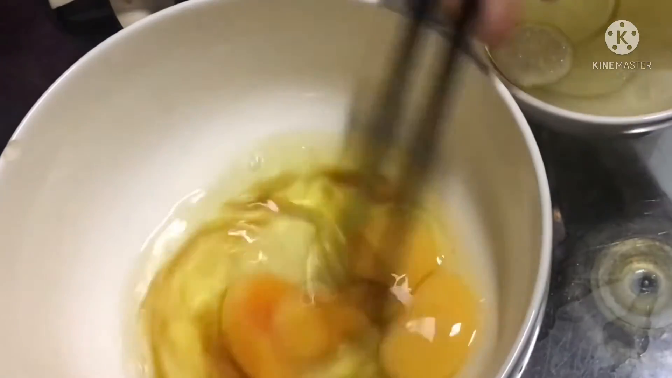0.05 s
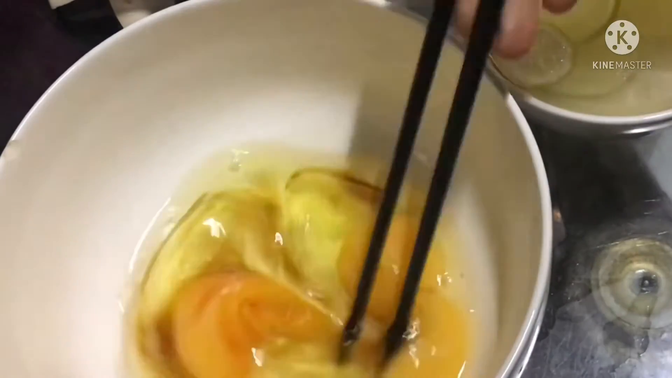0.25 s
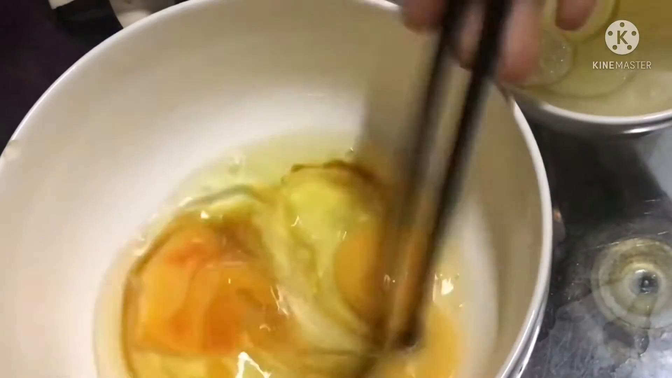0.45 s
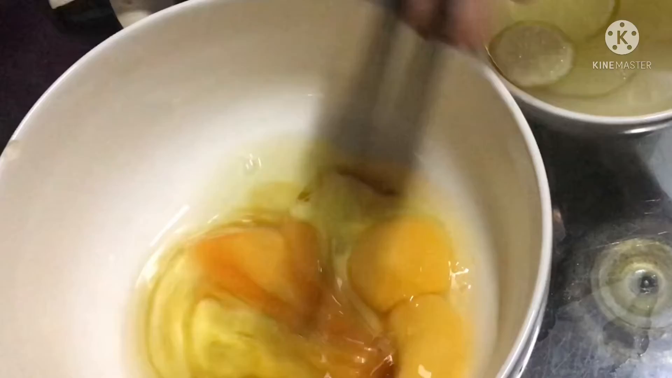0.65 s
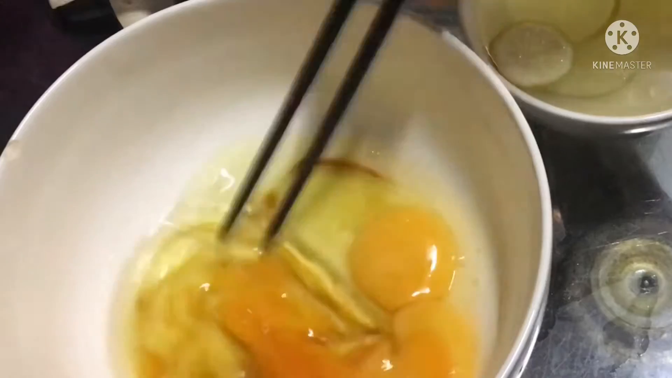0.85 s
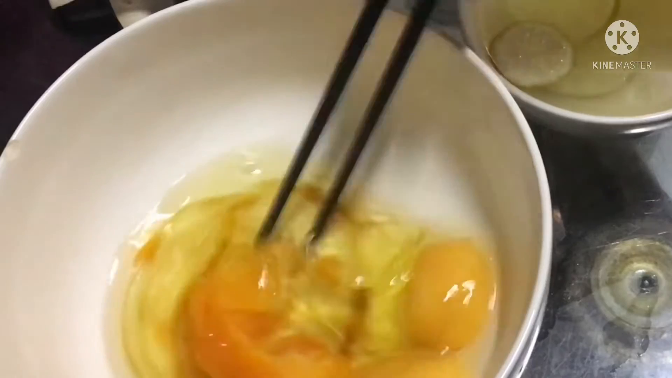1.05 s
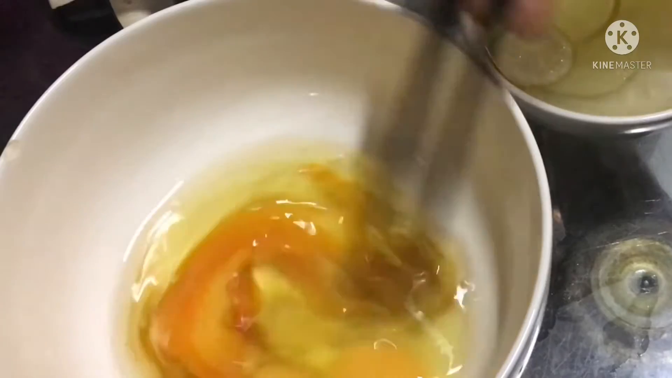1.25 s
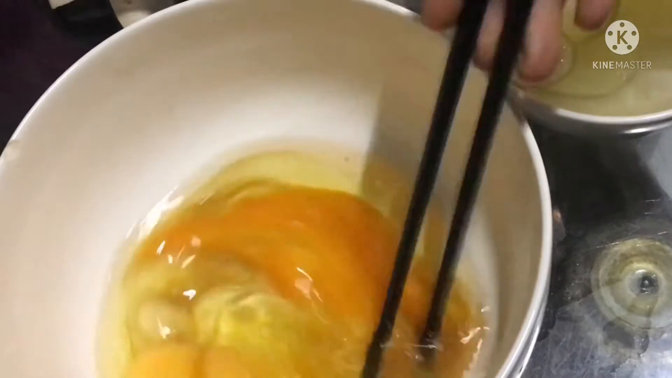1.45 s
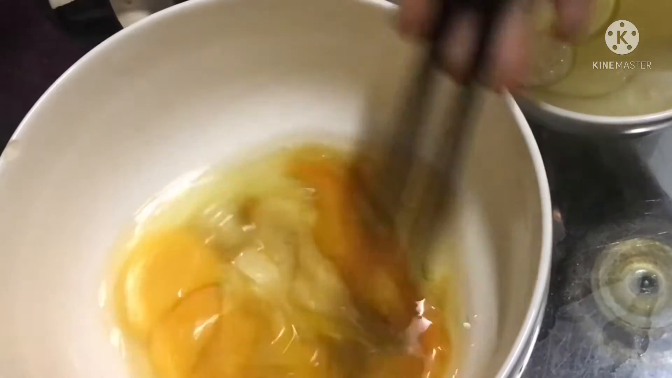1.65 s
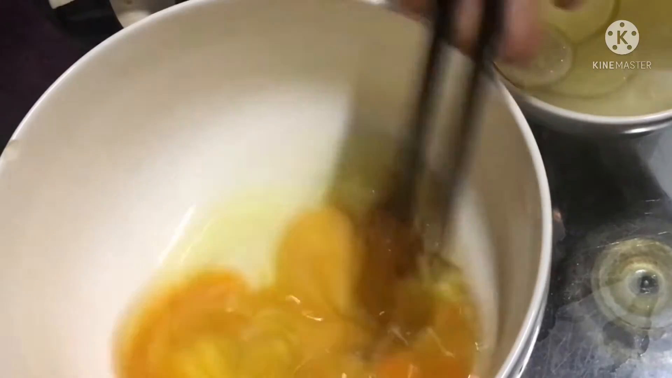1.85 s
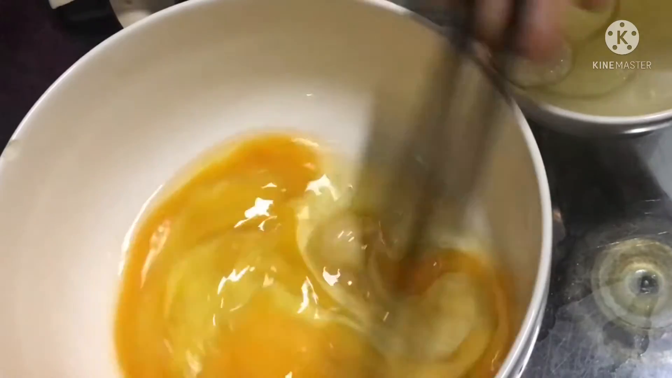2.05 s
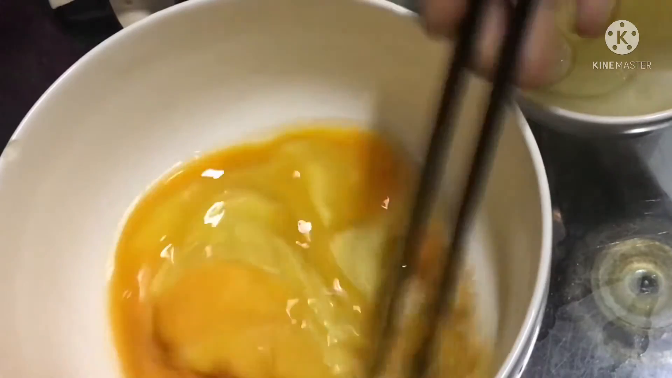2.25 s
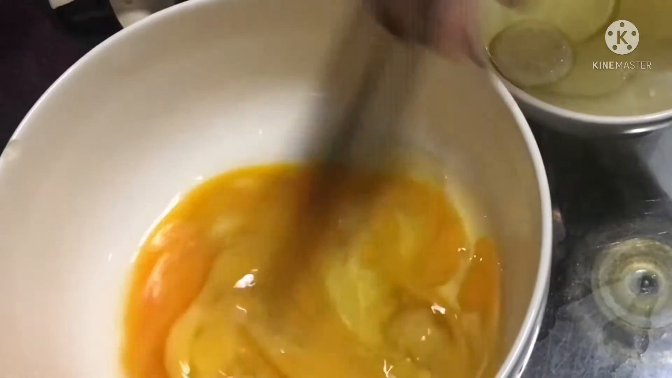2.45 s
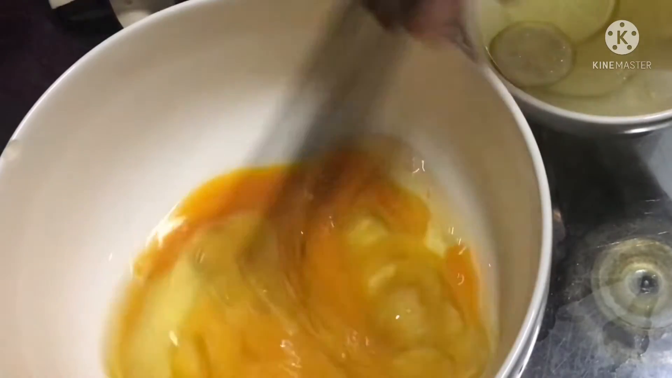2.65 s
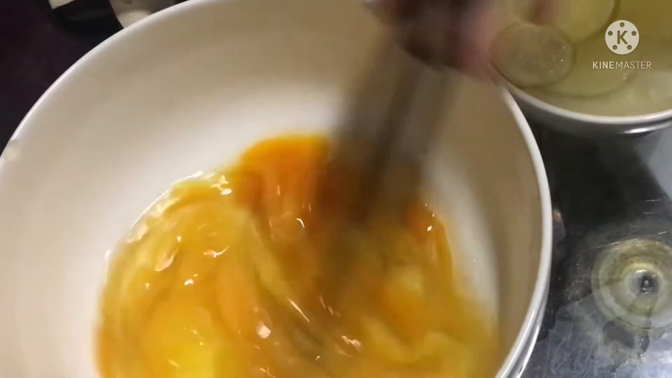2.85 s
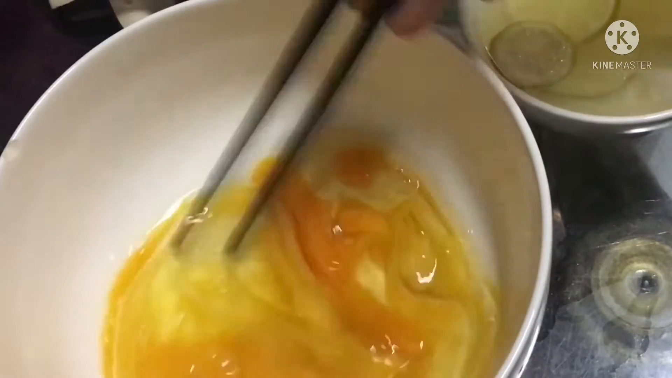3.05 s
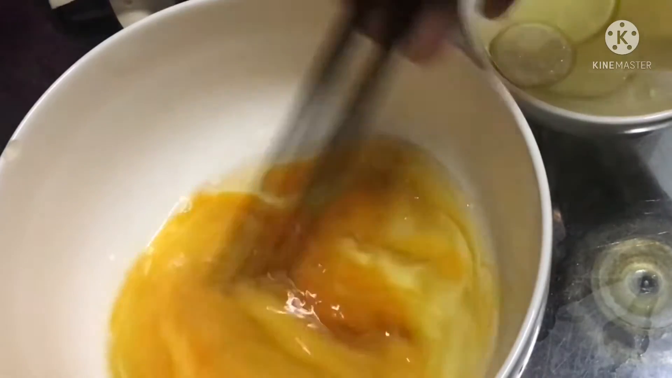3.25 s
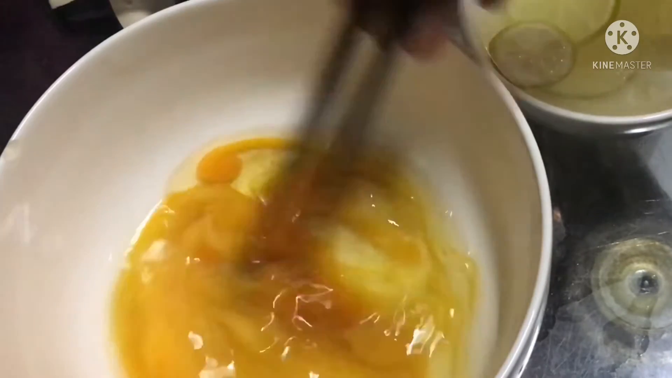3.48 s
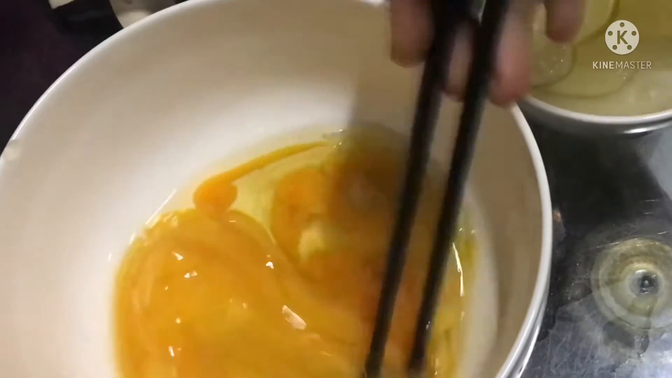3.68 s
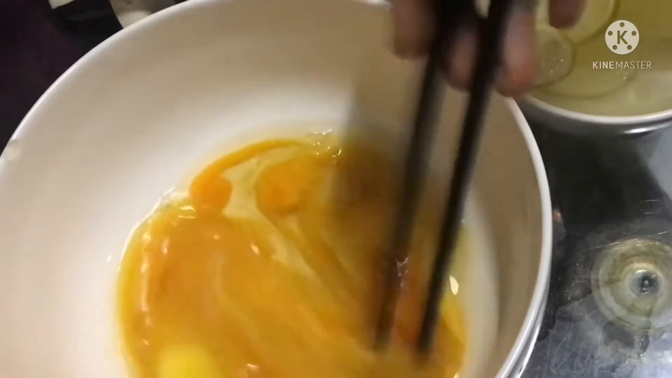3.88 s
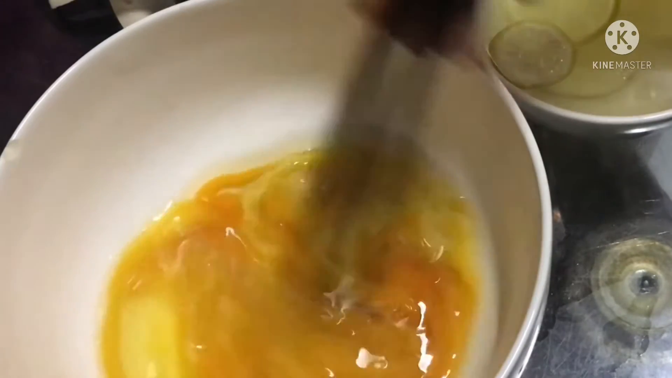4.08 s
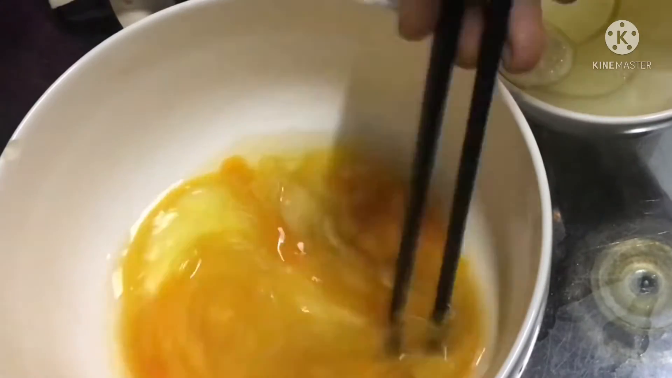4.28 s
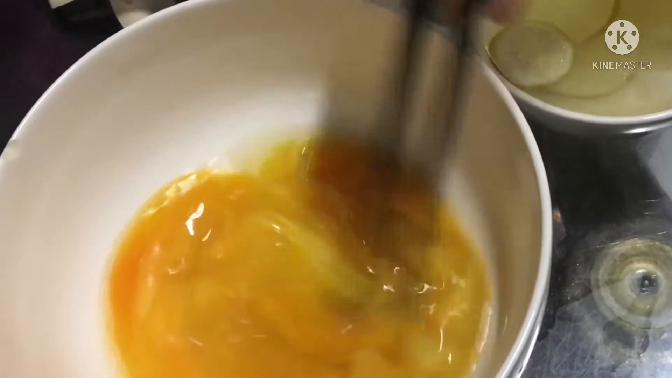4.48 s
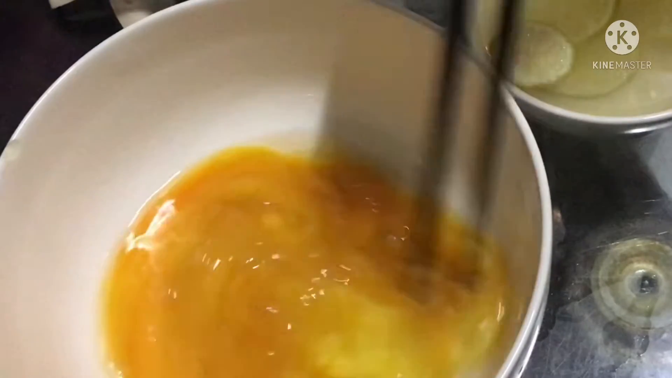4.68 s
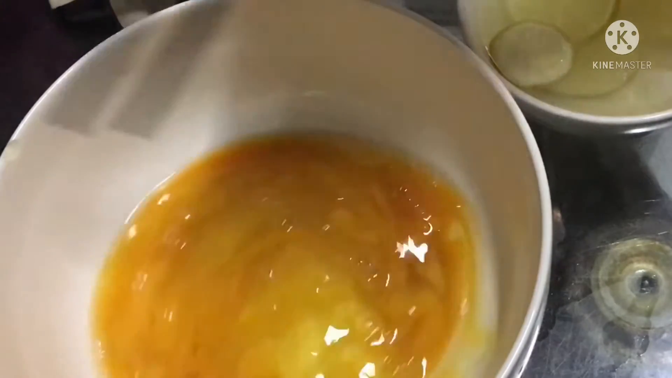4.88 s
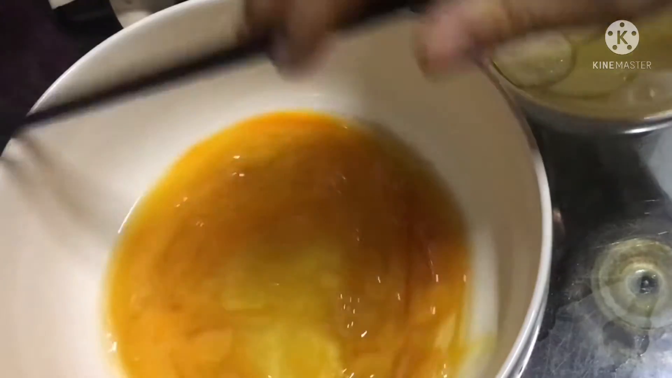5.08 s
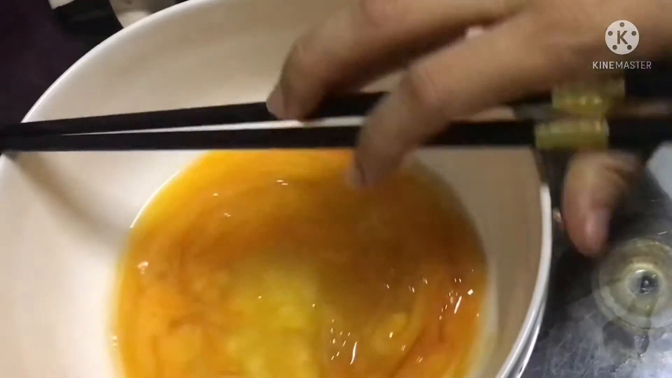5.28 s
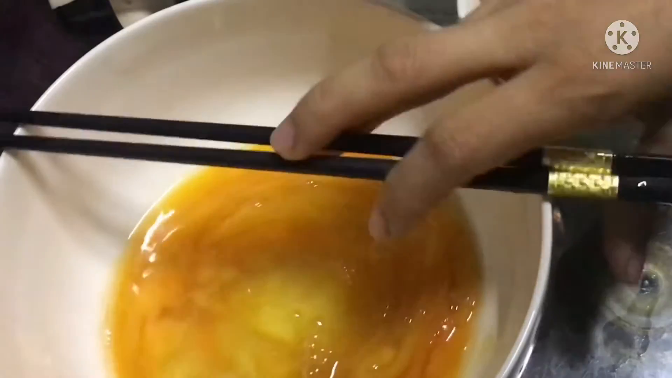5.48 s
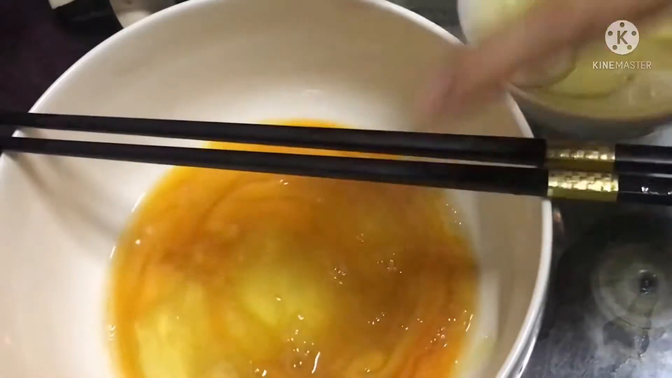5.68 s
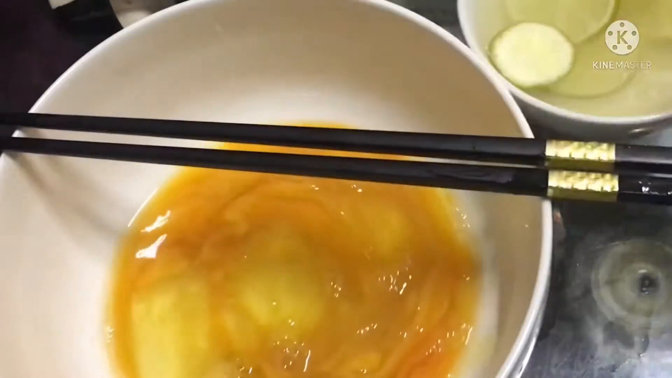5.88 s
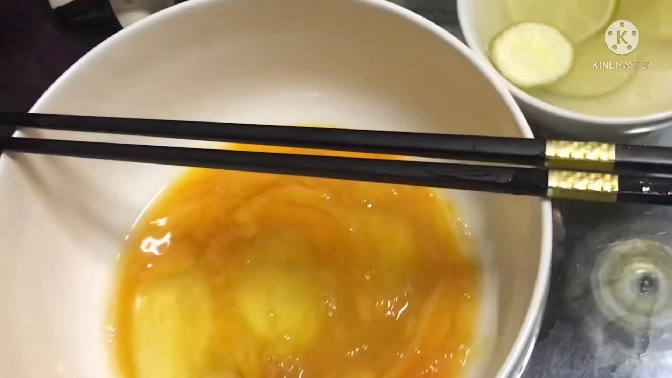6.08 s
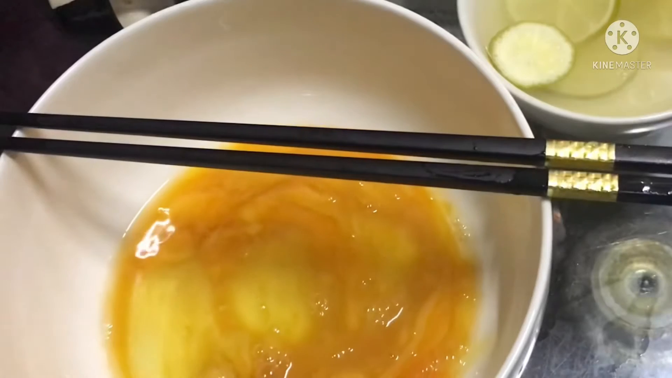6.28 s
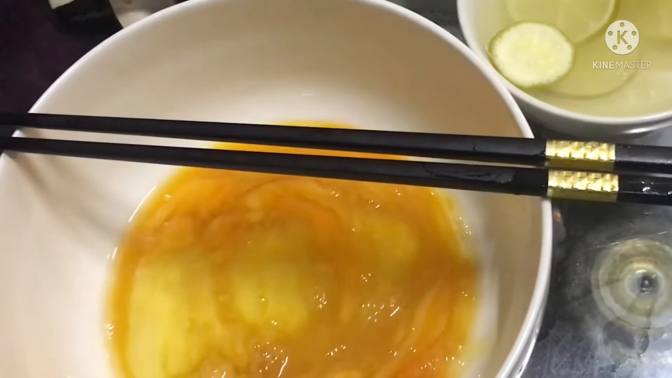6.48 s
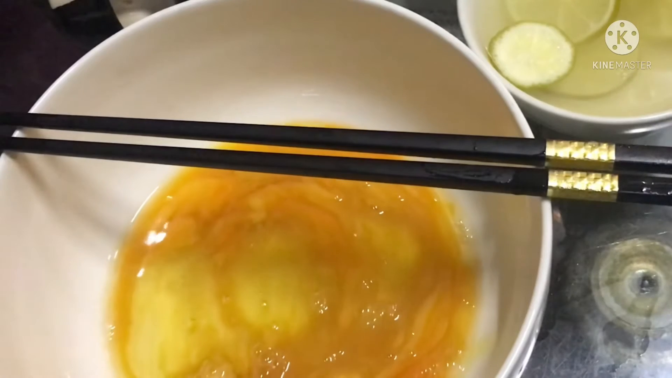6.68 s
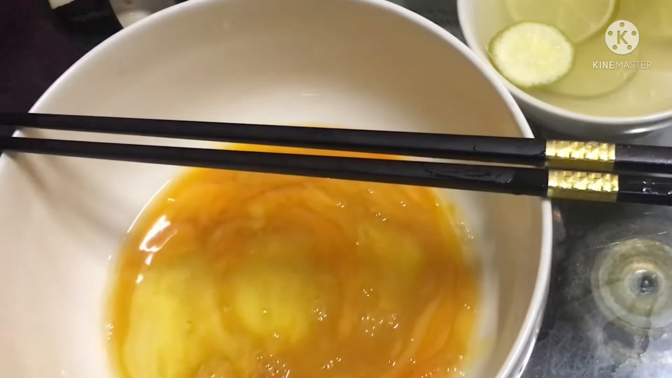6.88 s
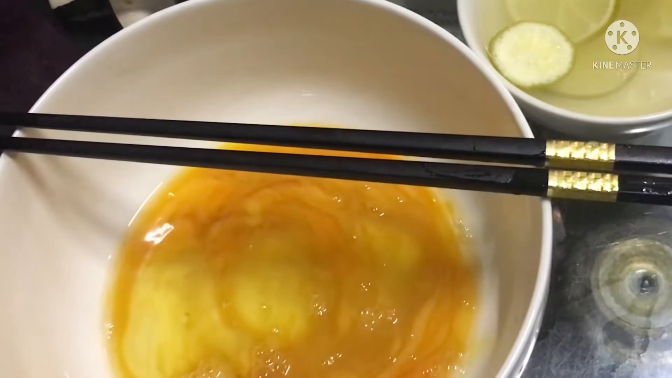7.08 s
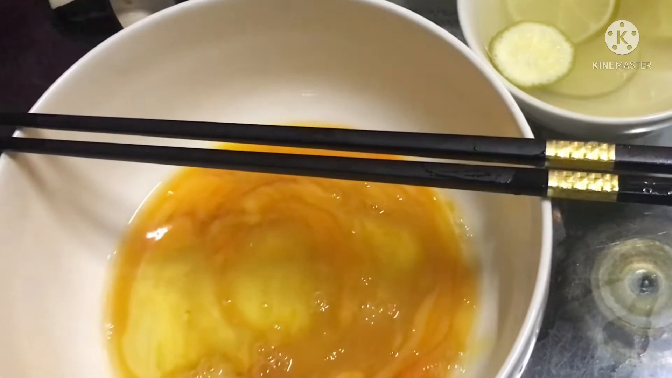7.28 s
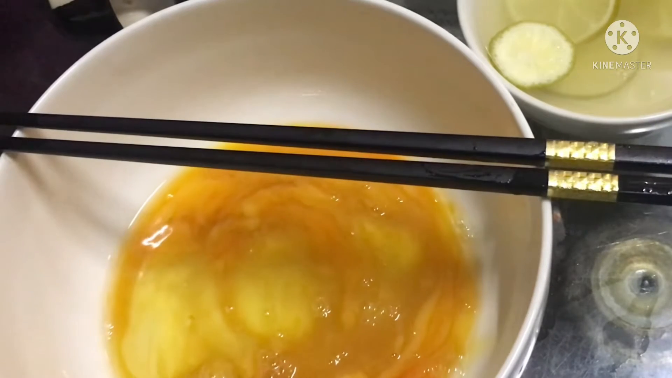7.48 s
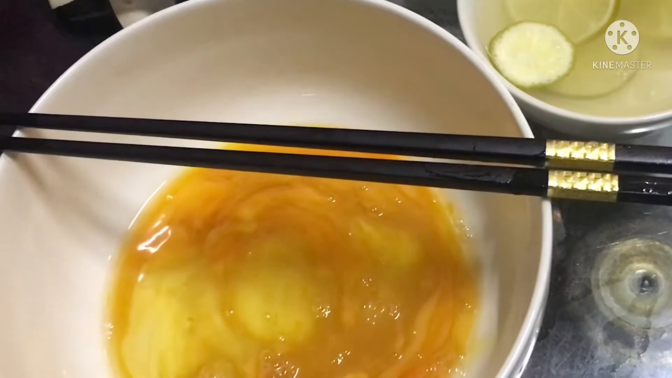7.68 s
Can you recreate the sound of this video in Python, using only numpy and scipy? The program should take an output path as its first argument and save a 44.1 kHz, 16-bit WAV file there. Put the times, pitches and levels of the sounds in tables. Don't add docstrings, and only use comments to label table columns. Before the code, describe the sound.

Fast, close ceramic tapping with gloopy egg splashes for five seconds, sticks laid down with a ringing rattle, then a quiet kitchen with far-off scrapes.

```python
import sys
import numpy as np
from scipy import signal
from scipy.fft import rfft, irfft, next_fast_len
from scipy.io import wavfile
from scipy.ndimage import uniform_filter1d

SR = 44100
rng = np.random.default_rng(int(sys.argv[2]) if len(sys.argv) > 2 else 0)


def how_loud(loudness_db):
    steps = np.asarray(loudness_db, float) / 20
    return 10 ** steps


def master_out(mix):
    frames = np.transpose(np.atleast_2d(mix))
    ceiling = np.clip(frames, -1, 1)
    pcm = np.round(ceiling * 32767).astype(np.int16)
    wavfile.write(sys.argv[1], SR, pcm)


N = 340893

# f/Hz, density/dB
ROOM_TONE = [(26, -5), (42, 5.5), (62, 7.5), (100, -5.5), (140, 1), (210, -8.5), (300, -15), (420, -2),
             (1250, -6.5), (2000, -14.5), (3200, -23), (5000, -28.5), (7000, -35), (9000, -31),
             (10500, -36.5), (16300, -32)]
# f/Hz, width/Hz, level/dB
FRIDGE_LINES = [(247.5, 12, -60), (296.2, 8, -57.5), (305, 45, -59.5), (597, 30, -61.5)]
# f/Hz, level/dB, t60/s
BOWL_MODES = [(774, -7.5, 0.04), (944, -6.5, 0.11), (1005, 6.5, 0.061), (1624, -16.5, 0.034),
              (1644, 2.5, 0.05), (2215, -10, 0.08), (2480, -7.5, 0.035), (2610, -14.5, 0.036),
              (3230, -8, 0.035), (3500, 0.5, 0.02), (3746, 2.5, 0.019), (3920, -6.5, 0.032),
              (4306, -8.5, 0.03), (4470, 1, 0.012), (5700, -9.5, 0.015), (6593, -8, 0.015),
              (6625, -0.5, 0.012), (7880, -10.5, 0.017), (8270, -2.5, 0.016), (8300, -11, 0.015),
              (9130, -2, 0.016), (2310, -7, 0.081), (10900, -11.5, .025), (12440, -14.5, .02),
              (14000, -26, .02), (14900, -8, 0.01)]
# f/Hz, level/dB, t60/s
UPPER_WALL_MODES = [(2226, 1, .2), (2500, -10, .12), (4370, -6, .22), (4430, -9, .15), (6600, -9, .14)]
# f/Hz, level/dB, t60/s
RIM_MODES = [(590, -13, .2), (755, -5, .22), (894, -12, .18), (1007, -22, .15), (1604, 0, .22),
             (1645, -16, .1), (2223, -15, .2), (2872, -5, .24), (4377, -6, .25), (4460, -9, .16),
             (5380, -11, .15), (6132, -12, .13), (8059, -18, .13)]

# t/s, peak/dB, pocket f/Hz, tap/dB
SPLASH_EVENTS = [(.078, -41, 9000, 0), (.706, -29.5, 6200, -7), (.721, -30, 10300, -18),
                 (.743, -29, 10800, -17), (.75, -43.5, 1190, 6), (.799, -30.5, 6940, -22),
                 (1.098, -19, 4060, -25.5), (1.115, -31.5, 14000, -5), (1.283, -26.5, 5800, -18),
                 (1.368, -28, 3370, 1), (1.650, -35.5, 4400, -16.5), (1.792, -32.5, 4470, -5.5),
                 (2.289, -21, 5080, -4), (2.372, -24.5, 1933, -18.5), (2.485, -23, 4440, 3.5),
                 (2.507, -15, 3500, -11.5), (2.545, -38, 5800, -13), (2.658, -10, 4580, -2.5),
                 (2.695, -26, 4360, -4), (3.056, -39.5, 2400, -3.5), (3.143, -36, 3300, -8),
                 (3.158, -28.5, 7000, -18.5), (3.244, -18, 4850, -23.5), (3.515, -50, 3570, -6),
                 (3.887, -34, 5190, -14.5), (7.292, -46, 9300, 0)]
# t/s, peak/dB, pocket f/Hz, tap/dB
AIR_POCKETS = [(0.506, -17.5, 1640, -9), (0.515, -35.5, 4040, 15), (0.542, -25.5, 3600, -31),
               (1.43, -23.5, 2260, -10.5), (1.702, -21.5, 2550, -4), (1.721, -12.5, 4380, -9),
               (1.762, -24.5, 3560, -20.5), (1.943, -15.5, 3600, -35.5), (2.081, -8.5, 4400, -5),
               (2.29, -18.5, 940, -16.5), (2.336, -17.5, 1593, -18.5), (2.371, -21, 4000, -10),
               (2.73, -13.5, 2024, -23), (2.847, -15, 4450, 1.5), (2.94, -26.5, 3320, -18),
               (3.106, -31, 2200, -7), (3.248, -10.5, 3460, -13), (3.405, -21.5, 3500, 1),
               (3.42, -25, 2480, -3), (3.457, -11.5, 1920, -9), (3.596, -10, 3340, -9.5),
               (3.61, -16, 1082, -52.5), (3.669, -28.5, 1380, -1), (3.771, -7.5, 3230, -4.5),
               (3.971, -14.5, 3630, 0.5), (4.183, -18, 2500, -2.5), (4.362, -31.5, 2420, -15),
               (4.381, -25, 1310, 7), (4.555, -32.5, 5500, -6.5)]
# t/s, peak/dB, pocket f/Hz, tap/dB
FURTHER_POCKETS = [
    (1.628, -41, 2930, -30),
    (1.6, -40.5, 3000, -24.5),
    (2.262, -31, 4150, -26),
    (2.341, -26, 2970, -6),
    (2.732, -29, 1600, -30),
    (2.860, -24, 2300, -32),
    (4.196, -16, 1037, -21),
]
# t/s, peak/dB, pocket f/Hz, tap/dB
DROPLETS_AND_TICKS = [(.572, -37, 3500, -20), (1.569, -34, 5500, 0), (1.775, -28, 3370, -24.5),
                      (1.787, -38.5, 5400, -20), (2.295, -30, 8300, -10.5), (2.328, -38, 3500, -25),
                      (2.486, -26.5, 7300, -25.5), (2.547, -37, 4200, -27), (3.670, -33, 5400, -21),
                      (3.838, -45.5, 9500, -20.5), (4.035, -38.5, 6500, -14.5), (4.098, -49.5, 7040, -22.5),
                      (4.197, -31, 5000, -15.5), (4.270, -40, 4305, -24), (4.366, -30, 4340, -23),
                      (4.660, -42, 5000, -22),
                      (1.534, -30.5, 2700, -5.5), (1.677, -27.5, 3500, -0.5), (3.951, -29.5, 2700, -6),
               (3.999, -37, 3300, -20), (4.445, -40.5, 3700, -20), (4.65, -47, 6500, -8.5),
               (.62, -55, 8500, -12), (5.157, -51, 2400, -26), (2.748, -37, 10000, -21),
               (2.859, -28, 6500, 2), (3.611, -32, 5000, -6), (2.82, -34, 7200, -21)]
# t/s, peak/dB, f/Hz, tap/dB
BOWL_RINGS = [
    (2.084, -21, 4360, -30),
    (2.292, -30, 1005, -30),
    (2.34, -32, 1610, -30),
    (2.376, -36, 3800, -30),
    (2.734, -29.5, 1620, -30),
    (5.186, -27.5, 1606, -30),
    (5.366, -39, 1604, -30),
    (5.436, -31.5, 1595, -30),
]

# t/s, second tip gap/ms, second tip level/dB
STROKE_TIPS = [(.1013, 2, 4), (.277, 3, 2), (.446, 4.5, 1), (.6375, 5.8, -1), (.8082, 1.8, 1),
               (.965, 2.7, 3), (1.1295, 4.4, 4), (1.302, 3.2, 5), (1.4818, 5.8, 4), (1.664, 6.6, -16),
               (1.848, 4, -6), (2.039, 3.6, 4), (2.228, 1, -1), (2.419, 4.4, -1), (2.6028, 1.4, 2),
               (2.791, 4.6, 0), (2.9865, 7, -5), (3.1752, 3.8, -4), (3.355, 1.2, 3), (3.542, 2.6, 4),
               (3.7268, 1.6, 4), (3.914, 3.3, 4), (4.1175, 2.2, 5), (4.301, 2.5, -5), (4.4885, 1.3, -4),
               (4.6752, 2.2, 0)]
STROKE_PEAKS = [-5.5, -7, -9, -6.5, -4, -1.5, -3.5, -3, -4.5, -6, -2.5, -2.5, -8, -3, -2, -4, -8, -2.5, -4,
                -3.5, -2, -2, 0, -3, -4.5, -1]
# f/Hz, level/dB, f/Hz, level/dB, lowest modes/dB
STROKE_PLACES = [(2140, 11.5, 3450, 8, -0.5), (2550, -6, 17000, 3, -26.5), (2270, 7, 6800, -27, 7.5),
                 (3725, 4, 9200, 4, 1), (1900, 13.5, 4400, -2.5, 11), (3540, -2, 4000, -5.5, 1),
                 (2270, 3.5, 3400, -14, 7), (2220, 8, 6600, -6, 4), (1600, -1, 8000, -12, -17),
                 (2740, -5.5, 9200, 8, -2.5), (2860, -11.5, 7300, 7.5, 1.5), (2550, 12.5, 22000, 0.5, 1.5),
                 (3000, -6.5, 6700, -4, 4), (3800, 2.5, 2900, -1, 0.5), (2200, 1.5, 13000, 8.5, 1),
                 (2550, 7, 8600, 8, 1.5), (3200, 3.5, 9300, -3, 1), (3210, 5.5, 4800, 1, 6),
                 (4400, 4.5, 5800, -3, 5), (2300, 6, 2700, 1.5, -3.5), (2300, 12.5, 6000, 8, 3.5),
                 (3270, 7.5, 9200, 4, 6), (4400, -5, 7400, 4, -1), (2550, 5, 3700, -9.5, 5),
                 (3650, -6, 6700, -16, -21), (3800, 5, 2230, 4.5, 8.5)]
# f/Hz, level/dB, treble/dB
STROKE_SLANTS = [(4900, 10, 3.5), (4400, -1, 6), (5700, 1, -1.5), (5600, -8, 2), (3770, 7.5, 4.5),
                 (3730, 3.5, 2), (4400, 0, 3.5), (2550, 2, 3.5), (1823, -7, 0.5), (1600, -7, -2),
                 (3600, 2.5, 4.5), (9220, -1, 4.5), (2200, -2.5, 8.5), (3020, 10.5, 4.5), (5700, -10, -2.5),
                 (12500, 2, 0.5), (3116, 6, 0.5), (3150, 0, 7.5), (4400, 5, -6.5), (2500, -1, 1),
                 (3180, 8.5, -2.5), (2230, 7, 1), (6740, 2, 2.5), (2200, -5.5, -0.5), (2500, 10, -1.5),
                 (6500, 3.5, -1.5)]
# t/s, peak/dB, low modes/dB, high modes/dB
RIM_KNOCKS = [(5.183, -15.5, -7.5, -1), (5.215, -5.5, -1, 9), (5.243, -13.5, -1, 12),
              (5.266, -18.5, -12, 26), (5.27, -21.5, 0, -6), (5.365, -35, 14, -26), (5.434, -31, 10, -25),
              (5.487, -13.5, 5, -10.5), (5.497, -19.5, -2, -3), (5.51, -11, 5.5, -9.5),
              (5.52, -26, 7, -18.5), (5.53, -27, 13, -20), (5.561, -44, 3, -14), (5.668, -36, 17, -21),
              (5.713, -33.5, 22.5, -26.5)]
# f/Hz, level/dB, f/Hz, level/dB, lowest modes/dB
RIM_PLACES = [(3000, -7, 5000, 5, 9), (2500, -8, 3400, 10, 7), (4400, 13, 3000, -18, 7),
              (5400, 3, 2900, -14, 0), (4400, -3, 3700, -8, -20), (4400, -4, 1800, -10, 14),
              (1600, 5, 4300, -9, 1), (9800, 19.5, 2020, 10.5, 4), (1600, 16, 4540, 4, -9),
              (1600, -3, 5000, 12, 1), (1600, 7, 6200, 4, 4), (1600, -6, 5000, -3, -2),
              (1600, -6, 8000, -3, 0), (1600, 0, 2940, 9, -1), (1600, -3, 4400, 0, -4)]

# t/s, level/dB, held/s, treble/dB
FAR_SCRAPES = [
    (6.274, -61, 0.014, -4),
    (6.381, -47.5, 0.0091, -18),
    (6.453, -35.5, 0.048, -6.5),
    (6.53, -33.5, 0.0096, -6.5),
    (6.616, -38.5, 0.023, -13),
    (6.795, -49.5, 0.025, -7.5),
    (7.04, -44, 0.0041, -15),
    (7.295, -65, 0.0054, 2),
]
# f/Hz, density/dB
SCRAPE_BODY = [(47, -39), (80, -5), (363, -1), (464, -26.5), (520, 0.5), (665, -5.5), (899, -2),
               (980, -2.5), (2500, -19.5), (3250, -48), (5500, -120)]
# f/Hz, density/dB
SCRAPE_RUSTLE = [(1290, -6), (2200, -1), (4760, -4), (5570, -8), (7330, -24), (8300, -14), (10600, -28),
                 (14400, -24), (16000, -26)]
# t/s, peak/dB, f/Hz, fade/ms, treble/dB
FAR_HITS = [
    (6.373, -43, 3030, 25, -20),
    (6.428, -37, 2000, 30, -24),
    (6.454, -21, 1500, 37, -15.5),
    (6.485, -22.5, 438, 8.4, -25),
    (6.523, -24, 570, 17, -25),
    (6.608, -32, 1020, 42, -19),
    (6.609, -34.5, 4130, 45, -30),
    (6.785, -35, 490, 58, -25),
    (7.041, -41, 3400, 25, -15),
    (7.128, -44.5, 3330, 34, -18),
]
# t/s, peak/dB, f/Hz, tap/dB
FAR_OBJECT_RINGS = [
    (6.456, -36, 5600, -30),
    (6.460, -35, 1217, -30),
    (6.472, -23, 1794, -30),
    (6.480, -34, 5480, -30),
    (6.527, -36, 1098, -30),
    (6.615, -35, 4050, -30),
    (6.617, -43, 1000, -30),
    (7.042, -40, 3320, -27),
    (7.043, -50, 5700, -33),
]
# f/Hz, level/dB
ROOM_TAIL = [(300, 10), (1000, 4), (3000, -1), (6000, -2), (10000, -6), (16000, 0.5)]
# f/Hz, level/dB
MIC_RESPONSE = [(4700, -1.5), (5250, -1.5), (5800, 5), (9700, 3), (10500, 0.5), (11400, 5), (15650, -2.5),
                (16000, -16.5), (17000, -23.5), (17200, -59.5)]

ROOM_TONE_DB = -50
LENS_HZ, LENS_START_S, LENS_SHIFT_S = 30.0, .0005, 5.16
BOWL_T60_S, SCATTER_DB = .065, 1.6
STIR_DB, STIR_ENDS_S, STIR_FADE_S = -64, 4.4, .05
EARLIER_DB, EARLIER_FADE_S = 12, .045
POCKET_CYCLES, SPLASH_CYCLES, SHORTEST_MS = 54, 8.1, 3.4
RING_CYCLES, FAR_RING_CYCLES = 310, 220
UPPER_STROKE_DB, UPPER_TAP_DB = -19.0, -18.0
ROOM_DB, ROOM_T60_S = -11.5, 0.27
GROUP_SHARPNESS, LOWEST_HZ, TREBLE_HZ = 9.7, 880, 7000
STROKE_LOW_DB, STROKE_HIGH_DB, LOW_PER_DB, HIGH_PER_DB = -12.5, 4, 0.58, 0.51
LAID_GAP_MS, LAID_SECOND_DB = 1.9, -12.5
FAR_RISE_DB_S, FAR_FADE_DB_S = 604, 183
BOWL_CUT_HZ, RIM_CUT_HZ = 725, 540
THUD_HZ, THUD_WIDTH_HZ, THUD_DB = 136, 14, 17
CEILING = .92


def level(x, db):
    return x * how_loud(db) / np.sqrt(np.mean(x ** 2))


def colour(x, points):
    hz, db = np.transpose(points)
    size = next_fast_len(len(x), True)
    f = np.maximum(np.arange(size // 2 + 1) * SR / size, 1)
    gain = how_loud(np.interp(np.log(f), np.log(hz), db))
    return irfft(rfft(x, size) * gain, size)[:len(x)]


def walk(rate):
    k = int(SR / rate)
    held = np.repeat(rng.standard_normal(N // k + 1), k)
    return uniform_filter1d(uniform_filter1d(held, k), k)[:N]


def add(out, s, sound, peak_db):
    i = int(s * SR)
    part = sound[:N - i]
    out[i:i + len(part)] += part * how_loud(peak_db) / np.max(np.abs(sound))


def room_tone():
    low = colour(colour(rng.standard_normal(N), ROOM_TONE), [(400, 5.5), (900, -14.0)])
    high = colour(colour(rng.standard_normal(N), ROOM_TONE), [(400, -14.5), (900, 4.0)])
    low *= how_loud(np.clip(9.0 * walk(5.1), -2, 2))
    high *= how_loud(0.7 * walk(1.2))
    return level(low + high, ROOM_TONE_DB)


def fridge():
    out = np.zeros(N)
    for hz, width, db in FRIDGE_LINES:
        line = signal.lfilter(*signal.iirpeak(hz, hz / width, SR), rng.standard_normal(N))
        out += level(line, db)
    return out


def lens_motor():
    out = np.zeros(N)
    count = int(N / SR * LENS_HZ)
    jitter = rng.standard_normal((count, 2))
    fade = np.exp(-np.arange(300) / (0.0014 * SR))
    casing = [(3500, -40.5), (5500, 2), (6500, -6), (7900, 3.5), (8800, 2.5), (9400, 6.5), (10500, -22.5)]
    for k, noise in enumerate(rng.standard_normal((count, 300))):
        step = k + .5 * (k < LENS_SHIFT_S * LENS_HZ)
        at = abs(LENS_START_S + step / LENS_HZ + 0.0011 * jitter[k, 0])
        add(out, at, colour(noise * fade, casing), -55.5 + np.clip(1.5 * jitter[k, 1], -3, 3))
    return out


def ring(modes, low_db, high_db, chance, longest_s, size=4000, spread=1):
    hz, db, t60 = np.transpose(modes)[:, :, None]
    t = np.arange(size) / SR
    tilt = np.interp(np.log(hz), np.log([1500, 2444, 4900, 5800]), [low_db, 0, 0, high_db])
    weight = how_loud(db + tilt + SCATTER_DB * chance[0, :len(hz), None])
    phase = 2 * np.pi * hz * (1 + spread * .007 * chance[1, :len(hz), None]) * t
    t60 = np.minimum(t60, longest_s * np.sqrt(1500 / hz))
    return np.sum(weight * np.sin(phase) * np.exp(-np.log(1000) * t / t60), axis=0)


def stir():
    t = np.arange(N) / SR
    wall = ring(BOWL_MODES, -7.5, -1.5, np.zeros((2, 30)), BOWL_T60_S, size=3000)
    flow = rng.standard_normal(N) * how_loud(3.3 * walk(27))
    flow *= np.exp(-np.maximum(t - STIR_ENDS_S, 0) / STIR_FADE_S)
    flow *= 1 + how_loud(EARLIER_DB) * np.exp(-t / EARLIER_FADE_S)
    return level(signal.fftconvolve(flow, wall)[:N], STIR_DB)


def even(burst, share):
    f = rfft(burst)
    size = np.abs(f) + 1e-9
    fade = np.clip(np.linspace(2, -2, len(burst)), 0, 1) ** 2
    flatten = (np.sqrt(np.mean(size ** 2)) / size) ** share
    return fade * irfft(f * flatten, len(burst))


def crack(noise, low_db, high_db, ms):
    shade = [(500, low_db - 16.0), (1000, low_db - 0.5), (2300, 8.0), (2750, -10.5), (3500, 8.0), (4500, 5.0),
             (5300, high_db - 7.5), (6700, high_db + 3.5), (7500, high_db - 1.5), (8500, high_db),
             (10500, high_db - 5.5), (16000, high_db - 8.0)]
    t = np.arange(len(noise)) / SR * 1000
    return colour(even(noise * np.exp(-t / ms), 0.88), shade) * np.exp(-t / (3 * ms))


def chatter(gap_ms, second_db, grit, skid_ms, skid_db, drag_ms, drag_db):
    t = np.arange(len(grit)) / SR * 1000
    late = t - gap_ms
    second = how_loud(second_db)
    skid = np.exp(-t / skid_ms) + second * (late > 0) * np.exp(-np.abs(late) / skid_ms)
    drag = grit * how_loud(drag_db) * np.exp(-t / drag_ms)
    force = even(grit * how_loud(skid_db) * skid, 0.99) + drag
    force[0] += 1
    force[np.argmax(late >= 0)] -= second
    return force


def pops(table, cycles, steady=1):
    pockets, taps, t = np.zeros(N), np.zeros(N), np.arange(3000) / SR
    draws = rng.standard_normal((len(table), 3060))
    chances, grits = draws[:, :60].reshape(-1, 2, 30), draws[:, 60:]
    for (s, db, hz, tap_db), chance, grit in zip(table, chances, grits):
        t60 = SHORTEST_MS / 1000 + cycles / hz
        shape = (1 - np.exp(-t * 1000 / 0.96)) * np.exp(-np.log(1000) * t / t60)
        wobble = 4e-5 * steady * hz * np.cumsum(grit)
        add(pockets, s, shape * np.sin(2 * np.pi * hz * t + wobble), db - 6.0)
        body = np.pad(ring(BOWL_MODES, -7.0, 1.3, chance, BOWL_T60_S / 2, size=2000), (0, 2000))
        body += how_loud(UPPER_TAP_DB) * ring(UPPER_WALL_MODES, 0, 0, 2 * chance, 1, spread=0.48)
        body[:1000] += how_loud(14.5) * crack(grit[:-1001:-1], -13.5, 1.5, 0.97)
        force = chatter(1.0, -11.0, grit, skid_ms=0.86, skid_db=-17.5, drag_ms=16.0, drag_db=-32)
        add(taps, s, signal.fftconvolve(body, force), db + tap_db + 1.5)
    return np.array([pockets, taps])


def room(x):
    t = np.arange(SR // 2) / SR
    noise = colour(rng.standard_normal(len(t)), ROOM_TAIL)
    dull = colour(noise, [(2500, -9.5), (6000, -18.5)])
    tail = dull * np.exp(-np.log(1000) * t / ROOM_T60_S)
    tail += (noise - dull) * np.exp(-np.log(1000) * t / (0.89 * ROOM_T60_S))
    tail *= 1 - np.exp(-t / 0.0078)
    return signal.fftconvolve(x, tail * how_loud(ROOM_DB) / np.sqrt(np.sum(tail ** 2)))[:N]


def favour(x, hz, db):
    band = signal.lfilter(*signal.iirpeak(hz, GROUP_SHARPNESS, SR), x)
    return x + (how_loud(db) - 1) * band


def land(x, place):
    for hz, db in (place[:2], place[2:4], (LOWEST_HZ, place[4]), place[5:7]):
        x = favour(x, hz, db)
    treble = signal.lfilter(*signal.butter(1, TREBLE_HZ, "high", fs=SR), x)
    return x + (how_loud(place[7]) - 1) * treble


def knocks(table, places, low_db, high_db, crack_db, crack_ms, contact, wash_db, wash_ms, rim_db=None):
    out, t = np.zeros(N), np.arange(8000) / SR * 1000
    chances = rng.standard_normal((len(table), 2, 30))
    grits = rng.standard_normal((len(table), 8000))
    wall = ring(BOWL_MODES, -1.5, -7.0, np.zeros((2, 30)), BOWL_T60_S / 5, size=1500)
    wall[0] += how_loud(10.5)
    for (s, db, low, high, gap_ms, second_db), place, chance, grit in zip(table, places, chances, grits):
        low, high = low + low_db, high + high_db
        body = ring(BOWL_MODES, low, high, chance, BOWL_T60_S)
        if rim_db is None:
            body += how_loud(UPPER_STROKE_DB) * ring(UPPER_WALL_MODES, 0, 0, 2 * chance, 1, spread=0.49)
        else:
            body = np.pad(body, (0, 11000 - len(body)))
            body += how_loud(rim_db) * ring(RIM_MODES, low / 2, 0, chance, 1, size=11000, spread=0)
        body[:1000] += how_loud(crack_db) * crack(grit[:-1001:-1], low, high, crack_ms)
        force = chatter(gap_ms, second_db, grit[:3000], **contact)
        add(out, s, signal.fftconvolve(land(body, place), force), db)
        slosh = grit[::-1] * (1 - np.exp(-t / 12.0)) * np.exp(-t / wash_ms)
        add(out, s, land(signal.fftconvolve(wall, slosh), place), db + wash_db)
    return out


def whisking():
    strokes = [(s, db, LOW_PER_DB * db, HIGH_PER_DB * db, gap_ms, second_db)
               for (s, gap_ms, second_db), db in zip(STROKE_TIPS, STROKE_PEAKS)]
    contact = dict(skid_ms=1.84, skid_db=-11.5, drag_ms=2.5, drag_db=-25.5)
    return knocks(strokes, np.hstack([STROKE_PLACES, STROKE_SLANTS]), STROKE_LOW_DB, STROKE_HIGH_DB,
                  crack_db=14.45, crack_ms=0.82, contact=contact, wash_db=-18.5, wash_ms=8.4)


def sticks_laid_down():
    rests = [tuple(row) + (LAID_GAP_MS, LAID_SECOND_DB) for row in RIM_KNOCKS]
    places = [tuple(row) + (1005, -9.0, 0.1) for row in RIM_PLACES]
    contact = dict(skid_ms=3.5, skid_db=-16.0, drag_ms=0.5, drag_db=-26.5)
    return knocks(rests, places, 0.53, 1.0, crack_db=25.2, crack_ms=0.57, contact=contact,
                  wash_db=-29.0, wash_ms=11.5, rim_db=-0.39)


def far_object():
    s, db, held, treble_db = np.transpose(FAR_SCRAPES)[:, :, None]
    t = np.arange(N) / SR
    body = level(colour(rng.standard_normal(N), SCRAPE_BODY), 0)
    rustle = level(colour(rng.standard_normal(N), SCRAPE_RUSTLE), 0)
    scrape_db = db - FAR_RISE_DB_S * np.maximum(s - t, 0) - FAR_FADE_DB_S * np.maximum(t - s - held, 0)
    out = body * how_loud(scrape_db.max(axis=0)) + rustle * how_loud((scrape_db + treble_db).max(axis=0))
    out *= how_loud(2.2 * walk(60))
    tail_ms = np.arange(6000) / SR * 1000
    for (at, peak_db, hz, ms, top_db), noise in zip(FAR_HITS, rng.standard_normal((len(FAR_HITS), 6000))):
        wide = colour(noise, [(hz / 6, -16), (hz / 5.7, -5), (hz, -.5), (hz * 1.3, -6),
                              (hz * 2.0 + 2500, top_db), (16000, top_db - 17)])
        add(out, at, wide * np.exp(-tail_ms / ms), peak_db)
    return out + pops(FAR_OBJECT_RINGS, FAR_RING_CYCLES)[0]


def scene():
    whisk, laid = whisking(), sticks_laid_down()
    pockets, taps = (pops(AIR_POCKETS, POCKET_CYCLES) + pops(SPLASH_EVENTS, SPLASH_CYCLES)
                     + pops(FURTHER_POCKETS, POCKET_CYCLES) + pops(DROPLETS_AND_TICKS, SPLASH_CYCLES))
    bowl_cut = signal.butter(8, BOWL_CUT_HZ, "high", fs=SR, output="sos")
    rim_cut = signal.butter(8, RIM_CUT_HZ, "high", fs=SR, output="sos")
    low_band = signal.butter(2, [390, 560], "band", fs=SR, output="sos")
    near = signal.sosfilt(bowl_cut, whisk + taps) + signal.sosfilt(rim_cut, laid)
    near += how_loud(-4.5) * signal.sosfilt(low_band, whisk + laid)
    worktop = signal.iirpeak(THUD_HZ, THUD_HZ / THUD_WIDTH_HZ, SR)
    near += how_loud(THUD_DB) * signal.lfilter(*worktop, np.abs(whisk) / 20)
    close = near + pockets + room(near + how_loud(-8.5) * pockets)
    close += pops(BOWL_RINGS, RING_CYCLES, steady=.2)[0] + stir()
    return (close + far_object() + room_tone() + fridge() + lens_motor())[None]


def band_limit(x):
    return signal.sosfilt(signal.butter(12, 17140, fs=SR, output="sos"), x)


def record(dry):
    heard = np.clip(colour(dry[0], MIC_RESPONSE), -CEILING, CEILING)
    return band_limit(heard[None])


dry = scene()
out = record(dry)
master_out(out)
```